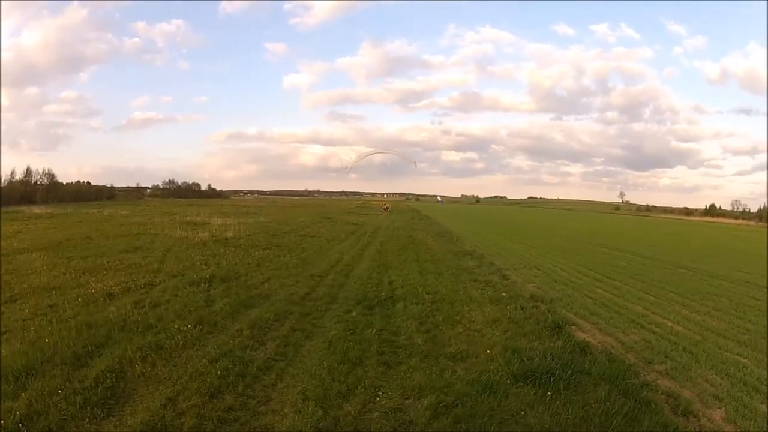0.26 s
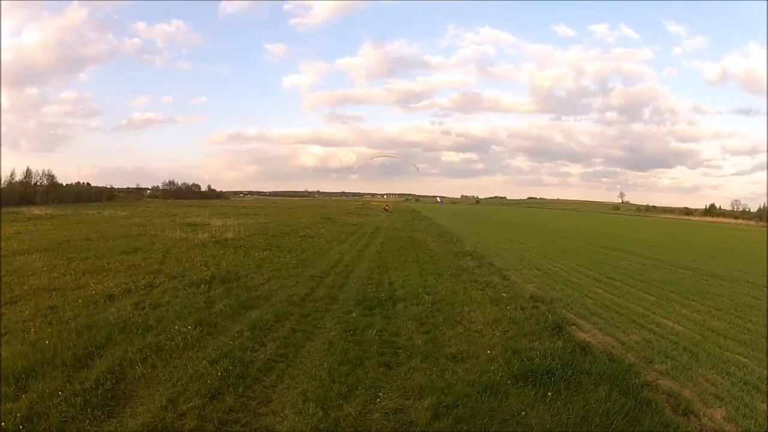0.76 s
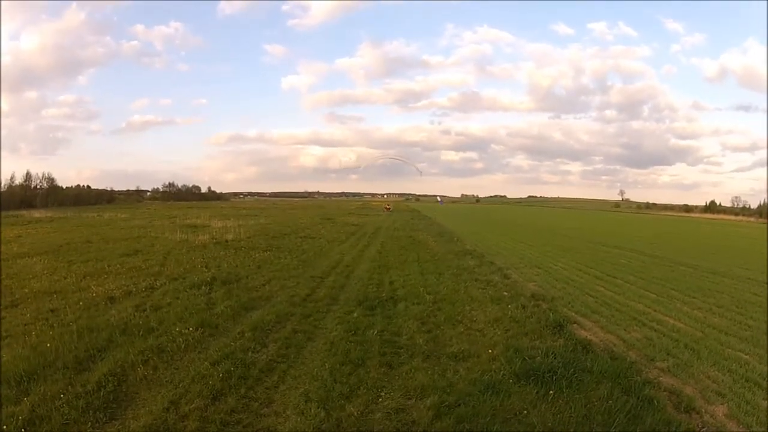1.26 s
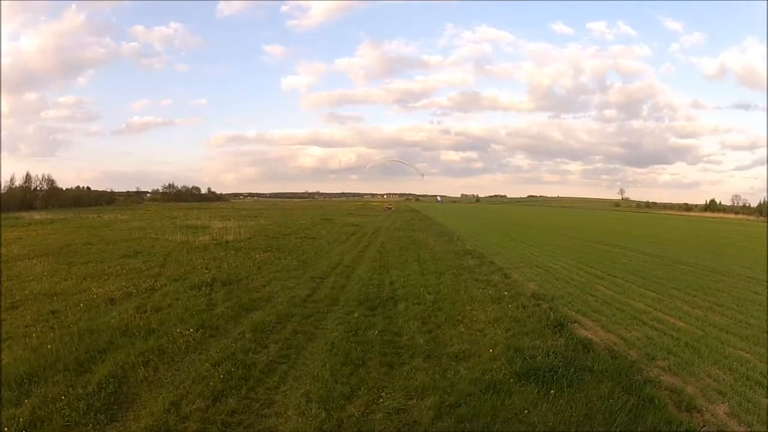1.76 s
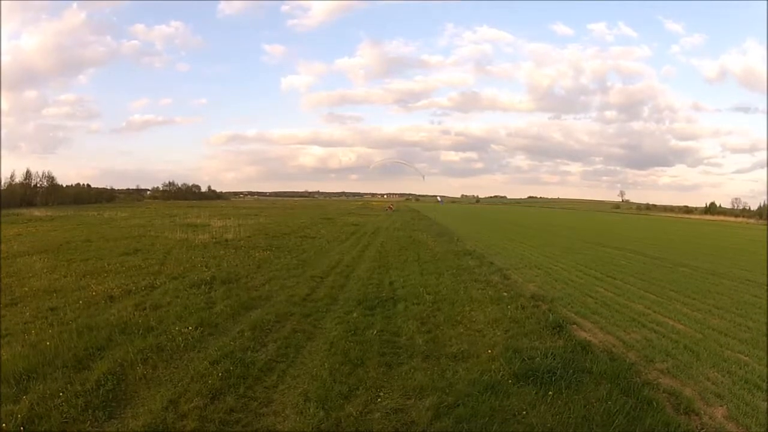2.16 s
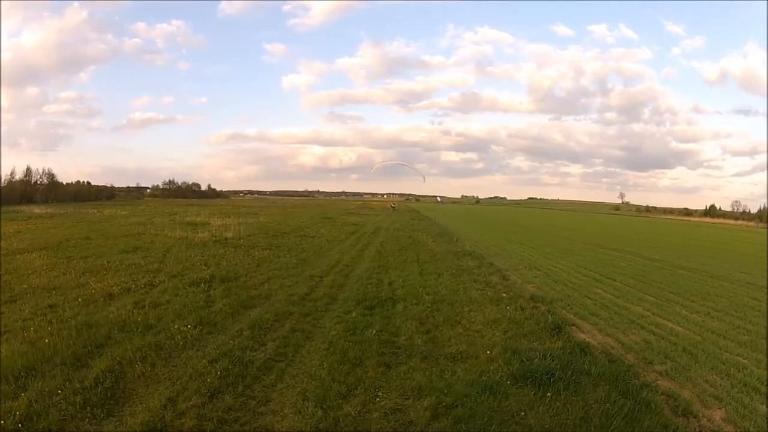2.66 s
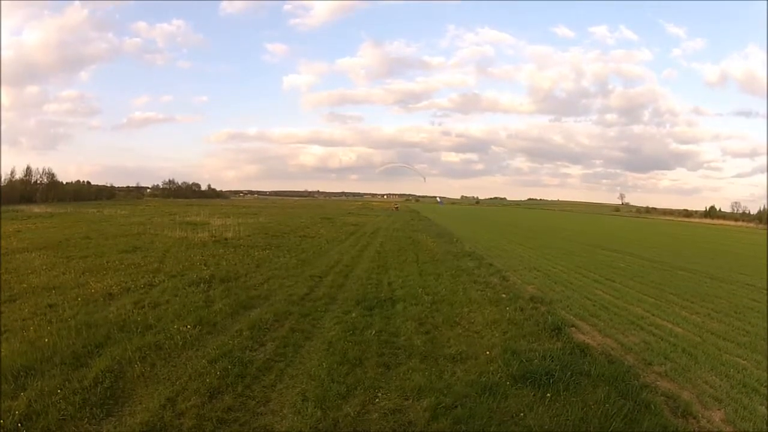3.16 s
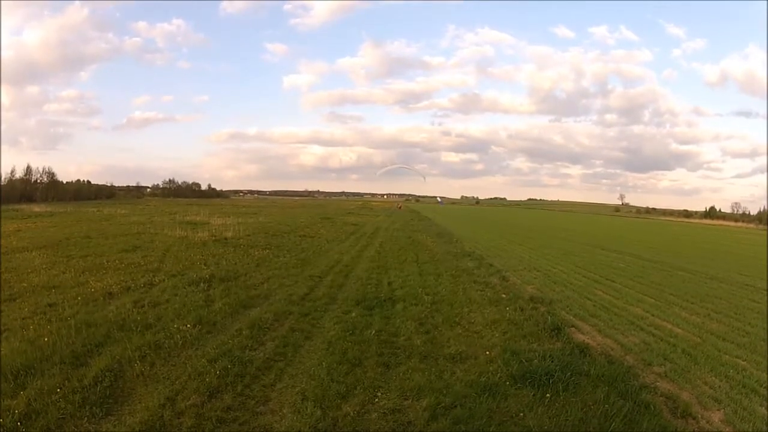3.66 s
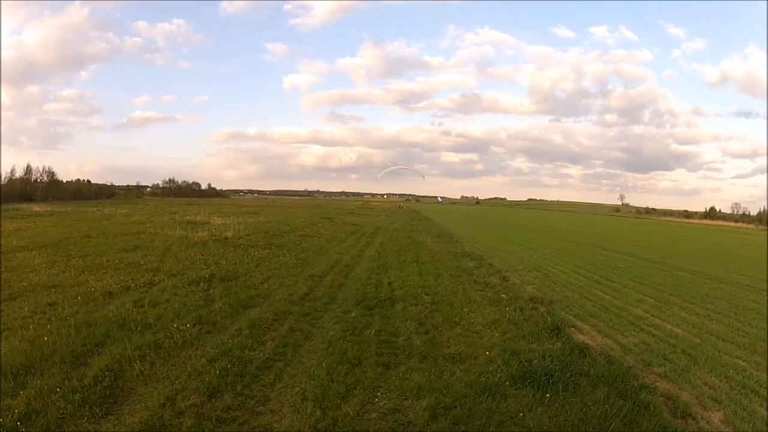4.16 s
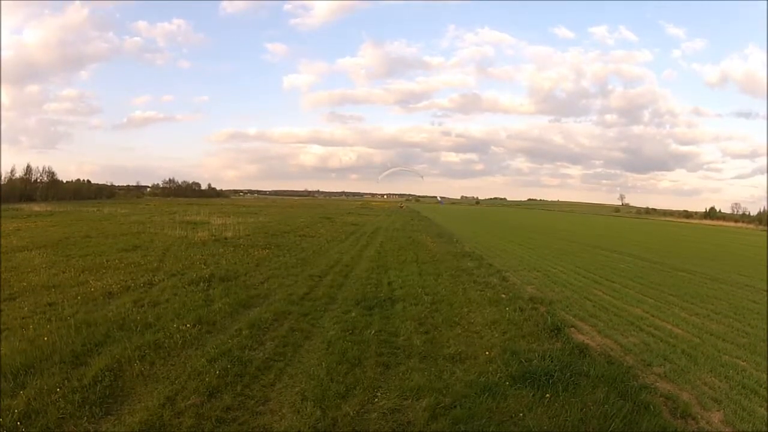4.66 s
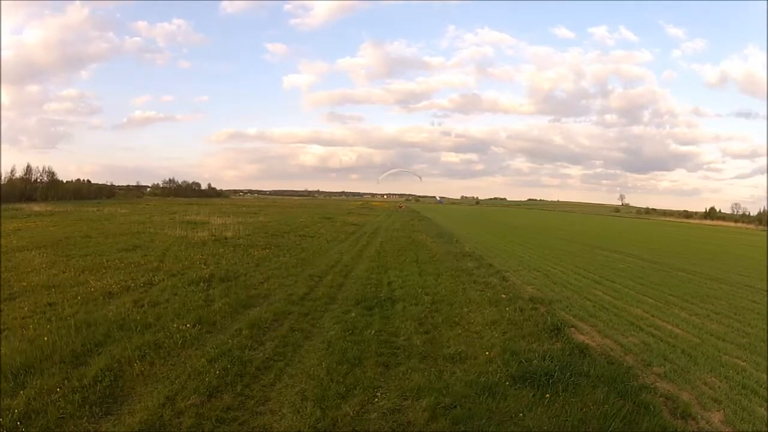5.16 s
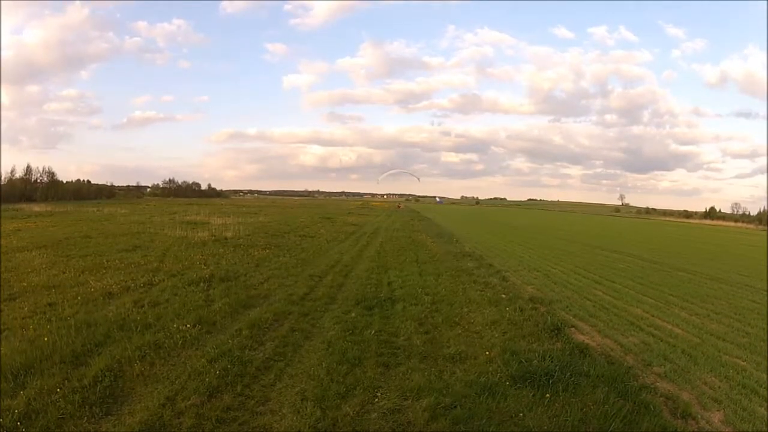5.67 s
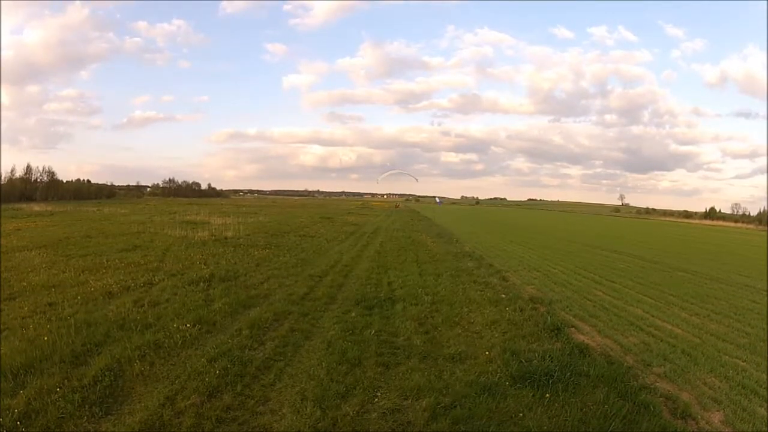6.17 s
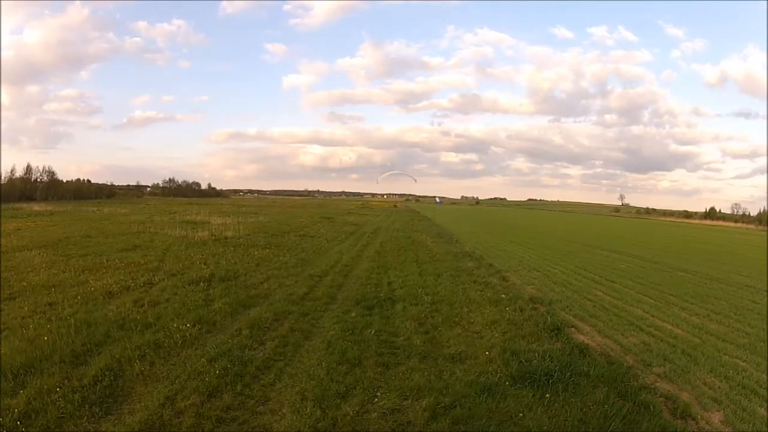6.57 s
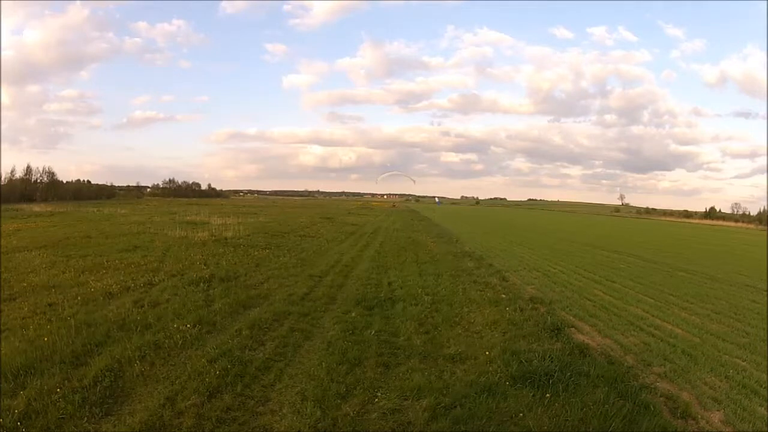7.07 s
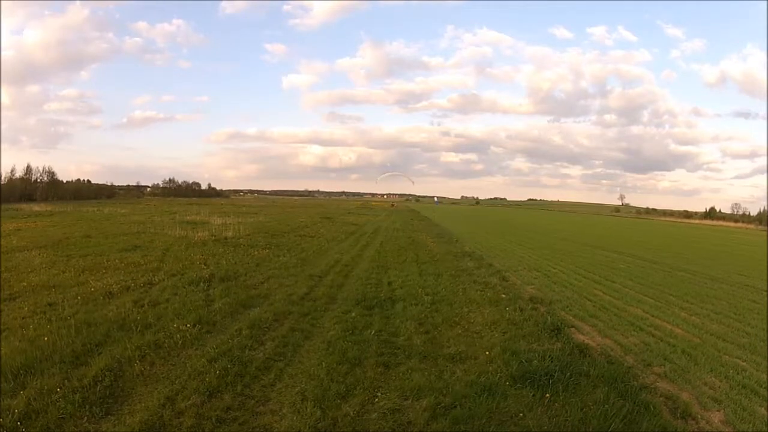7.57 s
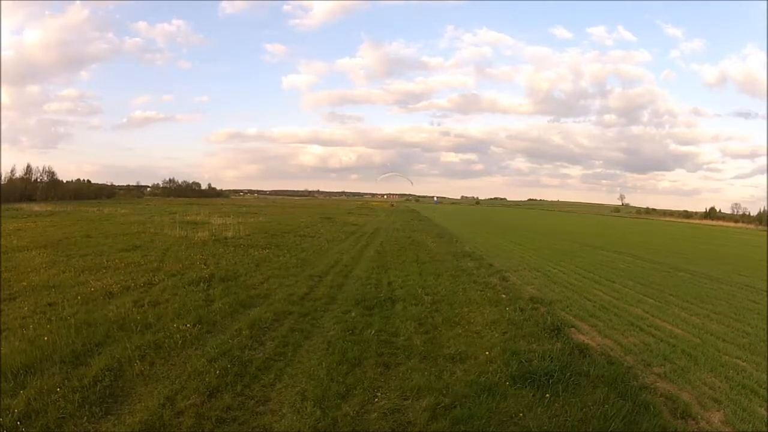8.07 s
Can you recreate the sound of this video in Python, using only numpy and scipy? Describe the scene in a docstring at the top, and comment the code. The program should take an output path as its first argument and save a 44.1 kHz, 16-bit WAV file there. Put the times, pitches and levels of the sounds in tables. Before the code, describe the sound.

Gusty wind rumbles on a microphone mounted on a small propeller-driven trike in a grassy field. The engine drones throughout, loudest at first, sagging slightly in pitch and then picking up again late. Its metal frame chatters with the vibration and knocks over several bumps in the first half. As the wind drops, a thin gear whine and the rattle come forward before a few last gusts.

```python
"""Paraglider trike on a grass field

Heard from a camera on the frame. A four-stroke engine drones under a geared propeller; the gear whines.
The frame rattles once a revolution and knocks over bumps. Wind buffets the microphone; a faint bird
chirps. A coarse sample-and-hold mirrors everything into a thin fizz."""
import sys
import numpy as np
from scipy import signal
from scipy.fft import rfft, irfft
from scipy.io import wavfile
from scipy.ndimage import uniform_filter1d

SR = 44100
rng = np.random.default_rng(int(sys.argv[2]) if len(sys.argv) > 2 else 0)


def dump_mix(stems):
    """Bounce the given channels to the path in sys.argv[1] as a 16-bit WAV at rate SR."""
    frames = np.atleast_2d(stems).T  # one column per channel
    limited = np.clip(frames, -1, 1)  # hard clip at full scale
    pcm = np.round(limited * 32767).astype(np.int16)
    wavfile.write(sys.argv[1], SR, pcm)


N = 366912
T = np.arange(N) / SR
CRUISE_RPS = 53

# ground bumps: (time [s], level [dB], relative ring [dB], crack re thud [dB])
GROUND_BUMPS = [(0.2, -40, -8, -13), (0.821, -39.5, -22, 1), (1.165, -40, -15, -4), (1.477, -44, -12, 1),
                (2.39, -33.5, -11, -17), (2.539, -33, -12, -12), (4.104, -43.5, -11, -11),
                (4.181, -45, -9, -23), (4.47, -37.5, -9, -11), (4.546, -38, -12.5, -15),
                (4.697, -35.5, -12, -13), (7.714, -39, -18, -18)]


def gain_of(db):
    """Decibels to amplitude."""
    return 10 ** (np.asarray(db) / 20)


def unit_rms(x):
    """Scale to rms 1."""
    return x / np.sqrt(np.mean(x ** 2) + 1e-20)


def curve(rows):
    """A (time [s], value) table at every sample."""
    return np.interp(T, *np.transpose(rows))


def wander(hz):
    """Smooth noise of rms 1, up to about hz."""
    bin_hz = np.arange(1025) * SR / (2 * N)
    slow = irfft(rfft(rng.standard_normal(2048)) / (1 + (bin_hz / hz) ** 4))[:1024]
    return np.interp(T, np.linspace(0, T[-1], 1024), unit_rms(slow))


def colour(x, spectrum):
    """Minimum-phase filter through (frequency [Hz], gain [dB]) points."""
    hz, db = np.transpose(spectrum)
    bin_hz = abs(np.fft.fftfreq(8192, 1 / SR))
    log_gain = np.log(gain_of(np.interp(np.log(bin_hz + 1), np.log(hz), db)))
    taps = np.fft.ifft(np.exp(signal.hilbert(log_gain).conj())).real[:4096]
    return signal.oaconvolve(x, taps)[:len(x)]


def resonate(x, hz, width_hz):
    """Unity-gain resonance at a steady or moving frequency."""
    carrier = np.exp(2j * np.pi * np.cumsum(hz * np.ones(len(x))) / SR)
    pole = np.exp(-np.pi * width_hz / SR)
    return 2 * (carrier * signal.lfilter([1 - pole], [1, -pole], x / carrier)).real


def add(mix, start_s, sound):
    """Mix a sound in at start_s."""
    part = mix[max(round(start_s * SR), 0):][:len(sound)]
    part += sound[:len(part)]


def tone(turns, db, waver_db, drift_rad):
    """One shaft order; moving air makes its level and phase waver."""
    amplitude = np.sqrt(2) * gain_of(db + waver_db * wander(3.9))
    return amplitude * np.sin(2 * np.pi * turns + drift_rad * wander(1.4))


def engine(turns, rps):
    """Exhaust drone, weaker crank orders and propeller tones, each following load and speed."""
    # exhaust loudness: (time [s], level [dB])
    drone_levels = [(0, -31.5), (.35, -32), (1.3, -37.5), (1.7, -37), (2.05, -41.5), (2.55, -38),
                    (3.6, -42), (4.9, -41), (5.9, -45.5), (6.3, -42.5), (8.32, -45.5)]
    # strong and weak crank orders, blade-rate harmonics:
    # (multiple, cruise level [dB], share of swell, speed slope [dB per rev/s])
    drone_orders = [(3, -41, 0.94, 0), (4, -52, 0.81, 1.14), (5, -54.5, 1.35, 0)]
    weak_orders = [(1, -53.5, 0.31, 1), (1.5, -53, 0.7, -2.5), (2, -48.5, 0.3, 0.93),
                   (2.5, -68.5, 0.33, 2.5), (3.5, -63.5, 0.53, -4), (4.5, -64, 0.49, 1.5),
                   (6, -69.5, 1.2, -0.5), (7, -83, 1.8, -3.4), (8, -80.5, 0.88, -1.5),
                   (9, -72.5, 0.42, 0.6), (10, -78, 0.16, 0.6), (11, -75.5, 0.27, -3)]
    blade_orders = [(1, -53.5, 0, 1.5), (2, -47.5, 0.89, 0), (3, -66, 0.83, 0), (4, -57, 0.74, -0.5),
                    (6, -69, 0.07, 0.8), (7, -87, 1.2, -5), (8, -69, 0.3, 0.5), (9, -65, 0, 0.5),
                    (10, -69, 0.12, 1.8), (12, -90.5, 0.69, 3.5)]
    cruise_db, blades_per_rev = -41, 12 / 11
    boom_hz, boom_width_hz, boom_db = 248, 10, 11  # exhaust resonance
    swell_db = curve(drone_levels) - cruise_db

    def levels(orders):
        return [(k, db + share * swell_db + slope * (rps - CRUISE_RPS)) for k, db, share, slope in orders]

    out = np.zeros(N)
    for k, db in levels(drone_orders):
        lift_db = boom_db / (1 + (2 * (k * rps - boom_hz) / boom_width_hz) ** 2)
        out += tone(k * turns, db + lift_db, waver_db=.6, drift_rad=.05)
    for k, db in levels(weak_orders):
        out += tone(k * turns, db, waver_db=1.3, drift_rad=.2)
    for k, db in levels(blade_orders):
        out += tone(k * blades_per_rev * turns, db, waver_db=1.6, drift_rad=.25)
    return out


def gearbox(turns, teeth=12):
    """The reduction gear whines at its tooth rate; higher shaft and blade partials sing above it."""
    # whine and singing: (time [s], level [dB])
    whine_levels = [(0, -68), (1.5, -71), (3, -75), (3.8, -66), (4.8, -68), (5.7, -68), (6.5, -64),
                    (7.4, -64.5), (8.32, -68)]
    singing_levels = [(0, -75), (1.5, -80), (5.6, -83), (6.5, -75), (7.3, -69), (8.32, -73)]
    # singing partials: (crank multiple, relative level [dB])
    partials = [(14.18, -8), (15.27, -9), (16.36, -9), (18.55, -4), (19.64, -5), (23, -6), (24, 0),
                (25.09, -7), (26.18, -8), (27.27, -8)]
    whine = tone(teeth * turns, curve(whine_levels), waver_db=1.3, drift_rad=.25)
    singing_db = curve(singing_levels)
    return whine + sum(tone(k * turns, singing_db + db, waver_db=-1, drift_rad=.33) for k, db in partials)


def prop_wash(turns):
    """Air torn by the propeller, throbbing slightly at the crank rate."""
    # wash noise: (frequency [Hz], relative density [dB])
    spectrum = [(60, -19), (250, 9), (320, -12.5), (420, -3.5), (580, 4.5), (680, 0.5), (800, -7.5),
                (1050, -21.5), (1650, -15.5), (2000, -9.5), (3000, -16.5), (3500, -22), (4600, -24.5),
                (6000, -29)]
    throb = 1 + .13 * np.cos(2 * np.pi * turns)
    air = unit_rms(colour(rng.standard_normal(N) * throb, spectrum))
    return air * gain_of(-55.5 + .79 * wander(1.4))


def chatter(turns, place_rev, scatter_rev, spread_db, limp_db, decay_s=.005):
    """Envelope of a loose contact striking once a revolution; alternate blows are limp_db weaker."""
    revs = np.arange(int(turns[-1]))
    lateness, strength = rng.standard_normal((len(revs), 2)).T
    hits = np.searchsorted(turns, revs + place_rev + scatter_rev * lateness).clip(0, N - 1)
    blows = np.zeros(N)
    blows[hits] = gain_of(spread_db * strength.clip(-2, 2) + limp_db[hits] * (revs % 2 - .5))
    return unit_rms(signal.lfilter([1], [1, -np.exp(-1 / (decay_s * SR))], blows))


def scrape(turns, repeat_share):
    """Roughness of rubbing contacts; a share of its power repeats each revolution."""
    cycle = unit_rms(np.interp(turns % 1, np.linspace(0, 1, 800), rng.standard_normal(800)))
    return np.sqrt(repeat_share) * cycle + np.sqrt(1 - repeat_share) * rng.standard_normal(N)


def shaking():
    """Frame shake amplitude: engine vibration plus a dying jolt after each bump."""
    # engine vibration: (time [s], level before trim [dB])
    shake_levels = [(0, -52.5), (.3, -53), (.85, -50.5), (1.25, -53), (1.42, -59), (2.1, -63), (2.42, -59),
                    (2.75, -62), (3.8, -65.5), (5.1, -62.5), (5.65, -65), (6.25, -55), (6.7, -53),
                    (6.9, -55.5), (7.85, -53), (8.32, -63.5)]
    trim_db, jolt_re_bump_db, jolt_decay_s = 1, -24.5, .016
    vibration = gain_of(curve(shake_levels) + trim_db + .43 * wander(16))
    jolts = sum(gain_of(db + jolt_re_bump_db) * (T > s) * np.exp(-abs(T - s) / jolt_decay_s)
                for s, db, *_ in GROUND_BUMPS)
    return np.hypot(vibration, jolts)


def frame_rattle(turns, rps):
    """Loose parts chatter at the crank rate, rebound and ring the tubes."""
    # contact noise: (frequency [Hz], relative density [dB])
    spectrum = [(300, -7.5), (700, -6), (1000, -3), (1400, 1.5), (1750, -0.5), (2150, 0.5), (2650, -5),
                (3050, -2), (3500, -12.5), (4000, -4), (4600, -19), (6000, -31.5)]
    # brightest band, moving as different parts come loose: (time [s], centre [Hz])
    bright_band = [(0, 2170), (.8, 2400), (1.25, 1500), (2.3, 1550), (4, 2160), (5.8, 1570), (6.25, 2360),
                   (6.75, 2680), (7.05, 1940)]
    # tube resonances: (frequency [Hz], width [Hz], gain [dB])
    tube_modes = [(1842, 11, 10), (1929, 18, 5), (2840, 60, 2), (3147, 18, 5)]
    rattle_offset_db, floor_db = -65.5, -79  # weak shaking fades the rattle to a faint, steady floor

    # slow or slowing: uneven blows; fast: an even rasp
    extra_rps = rps - CRUISE_RPS
    slowing_rps_per_s = np.clip(-uniform_filter1d(np.gradient(rps) * SR, size=SR // 3), 0, 5)
    limp_db = np.maximum(3.5 - .8 * extra_rps + .5 * slowing_rps_per_s, 0)
    rasp = gain_of(.4 * extra_rps - .15 * slowing_rps_per_s)
    strike = chatter(turns, place_rev=.33, scatter_rev=.02, spread_db=2, limp_db=limp_db)
    rebound = chatter(turns, place_rev=.7, scatter_rev=.12, spread_db=2.5, limp_db=limp_db)
    contact = (strike + rasp * (.4 * rebound + .55)) / np.sqrt(1 + rasp + rasp ** 2)

    roughness = scrape(turns, repeat_share=np.clip(.22 * rasp ** 2, 0, 1))
    grit = colour(roughness * contact, spectrum)
    grit = grit + 1.62 * resonate(grit, curve(bright_band), width_hz=800)
    ring = sum(gain_of(db) * resonate(grit, hz, width_hz) for hz, width_hz, db in tube_modes)
    power = np.maximum(shaking() ** 2 - gain_of(rattle_offset_db) ** 2, gain_of(floor_db) ** 2)
    return unit_rms(grit + ring) * np.sqrt(power)


def wind():
    """Low turbulence and higher tearing noise at the microphone; each gust swells both in one arch."""
    # airflow between gusts: (time [s], level [dB])
    rumble_levels = [(0, -32.5), (1.3, -33.5), (2.1, -36), (2.55, -41), (3.3, -40), (4.2, -44), (5.1, -44),
                     (5.6, -47), (6.7, -47), (7.4, -42.5), (8.32, -43)]
    tear_levels = [(0, -43.5), (.6, -53.5), (1.3, -50.5), (1.9, -48.5), (2.25, -52.5), (2.9, -52),
                   (3.6, -55), (4.9, -58), (5.8, -73), (6.7, -80), (7.2, -67), (8.32, -59)]
    # airflow noise: (frequency [Hz], relative density [dB])
    rumble_spectrum = [(10, -20.5), (25, -7), (45, 0), (70, 0.5), (120, -6.5), (180, -9), (250, -11.5),
                       (330, -24.5), (450, -27.5), (700, -41.5), (1100, -43), (3000, -65)]
    tear_spectrum = [(80, -16.5), (200, 1.5), (370, 0), (450, -4), (700, -11), (950, -20.5), (1500, -30),
                     (3000, -40.5)]
    # gusts: (middle [s], length [s], rumble rise [dB])
    gusts = [(0.255, .2, 3), (0.717, 0.25, 8), (1.103, 0.29, 5.5), (1.53, 0.12, 4.5), (1.796, 0.17, 6.5),
             (1.91, 0.13, 3), (2.196, .2, 3.5), (2.9, 0.34, 2), (3.67, 0.16, 4), (7.096, 0.18, 10.5),
             (7.215, 0.11, 6.5), (7.85, .16, 4), (7.976, .14, 6)]
    gust_db = sum(db * np.cos(np.pi * np.clip((T - middle_s) / length_s, -.5, .5)) ** 2
                  for middle_s, length_s, db in gusts)
    rumble = unit_rms(colour(rng.standard_normal(N), rumble_spectrum))
    rumble *= gain_of(curve(rumble_levels) + gust_db + 1.9 * wander(17))
    tear = unit_rms(colour(rng.standard_normal(N), tear_spectrum))
    tear *= gain_of(curve(tear_levels) + .58 * gust_db + 2.3 * wander(28))
    return rumble + tear


def knocks():
    """Each bump thuds, cracks and rings the camera mount."""
    # impact noise: (frequency [Hz], relative density [dB])
    thud_spectrum = [(200, -25), (450, 10), (750, 11.5), (1200, -6), (2200, -10), (3000, -20), (3800, -30),
                     (6000, -39)]
    crack_spectrum = [(300, -16), (900, -1), (1400, 0), (2200, -3), (3000, -1), (3600, -14), (4400, -24),
                      (6000, -36)]
    # mount resonances: (nominal frequency [Hz], relative level [dB], t60 [s])
    mount_modes = [(475, 8, 0.061), (692, 2.5, 0.14), (770, -1.5, 0.095), (830, -4, 0.2),
                   (1102, -13.5, 0.15), (1360, -6.5, 0.079), (1850, -18, .06), (2890, -7, 0.058)]
    out = np.zeros(N)
    t = np.arange(SR // 5) / SR
    thud_envelope = (1 - np.exp(-t / .00021)) * np.exp(-t / .0023)
    for time_s, db, ring_db, crack_db in GROUND_BUMPS:
        thud = colour(rng.standard_normal(len(t)) * thud_envelope, thud_spectrum)
        crack = colour(rng.standard_normal(len(t)) * np.exp(-t / .0024), crack_spectrum)
        blow = gain_of(-22.5) * (unit_rms(thud) + gain_of(crack_db) * unit_rms(crack))
        ring = np.zeros(len(t))
        for hz, mode_db, t60_s in mount_modes:
            phase = 2 * np.pi * hz * rng.uniform(.93, 1.015) * t + rng.uniform(0, 2 * np.pi)
            ring += gain_of(mode_db - 60 * t / t60_s) * np.sin(phase)
        ring *= 1 - np.exp(-t / .0024)
        add(out, time_s - .001, gain_of(db) * (blow + gain_of(ring_db) * ring))
    return out


def bird():
    """Short gliding whistles, almost buried under the engine."""
    # chirps: (time [s], length [s], start [Hz], end [Hz], level [dB])
    chirps = [(5.14, .07, 4850, 4680, -79), (5.3, .05, 4950, 4870, -78), (5.335, .04, 4900, 4660, -71),
              (5.385, .03, 4100, 3600, -73), (5.41, .03, 3950, 4600, -78), (5.475, .06, 4850, 4780, -79)]
    out = np.zeros(N)
    for time_s, length_s, start_hz, end_hz, db in chirps:
        hz = np.linspace(start_hz, end_hz, int(length_s * SR))
        whistle = np.sqrt(2) * np.sin(2 * np.pi * np.cumsum(hz) / SR)
        add(out, time_s, gain_of(db) * np.hanning(len(hz)) * whistle)
    return out


def scene():
    """One crankshaft drives engine, gear, propeller and rattle; wind, knocks and a bird join in."""
    # crankshaft: (time [s], speed [rev/s])
    crank_speed = [(0.0, 57.2), (0.35, 58.7), (0.69, 57.0), (1.18, 54.3), (1.46, 50.0), (1.99, 53.5),
                   (2.29, 50.2), (2.53, 52.7), (2.83, 55.3), (3.26, 54.3), (3.59, 52.5), (4.26, 52.4),
                   (5.33, 50.7), (5.58, 49.6), (6.12, 50.1), (6.7, 55.0), (7.37, 56.7), (7.9, 55.3),
                   (8.23, 53.2), (8.32, 51.1)]
    rps = curve(crank_speed)
    turns = np.cumsum(rps) / SR + .004 * wander(8)
    machine = engine(turns, rps) + gearbox(turns) + prop_wash(turns) + frame_rattle(turns, rps)
    fade_out = np.clip((T[-1] - T) / .008, 0, 1)
    return fade_out * (machine + wind() + knocks() + bird())[None]


def record(dry):
    """Sample-and-hold mirrors the sound around the hold rate; a low-pass limits the fizz."""
    hold_hz, anti_alias_hz, edge_hz = 12000, 5900, 15330
    anti_alias = signal.firwin(129, anti_alias_hz, fs=hold_hz)
    band_limit = signal.firwin(711, edge_hz, window=("kaiser", 9), fs=SR)
    coarse = signal.resample_poly(dry, hold_hz, SR, axis=1, window=("kaiser", 6))
    coarse = signal.oaconvolve(coarse, anti_alias[None], "same")
    held = np.repeat(coarse, 4, axis=1)
    steps = signal.resample_poly(held, SR, 4 * hold_hz, axis=1)[:, :N]
    return signal.oaconvolve(steps, band_limit[None], "same")


dry = scene()
out = record(dry)
dump_mix(out)
```